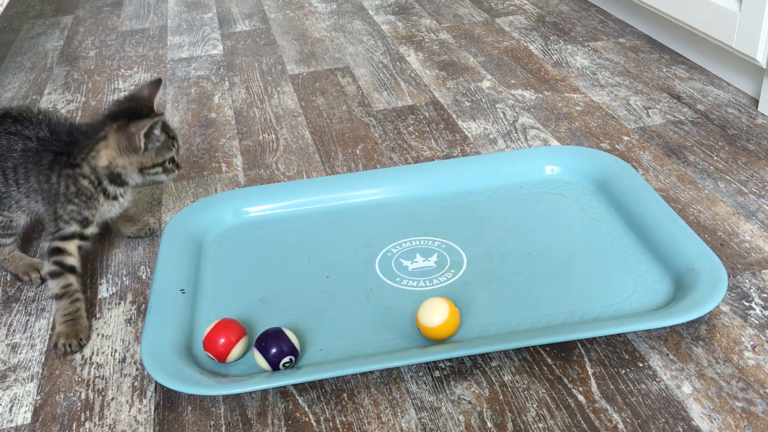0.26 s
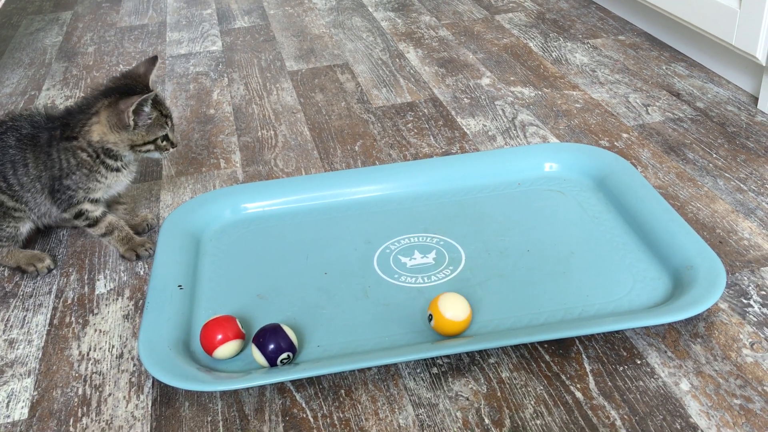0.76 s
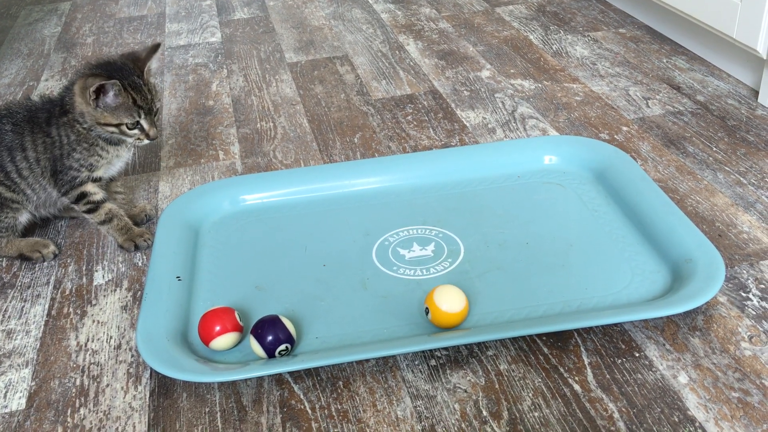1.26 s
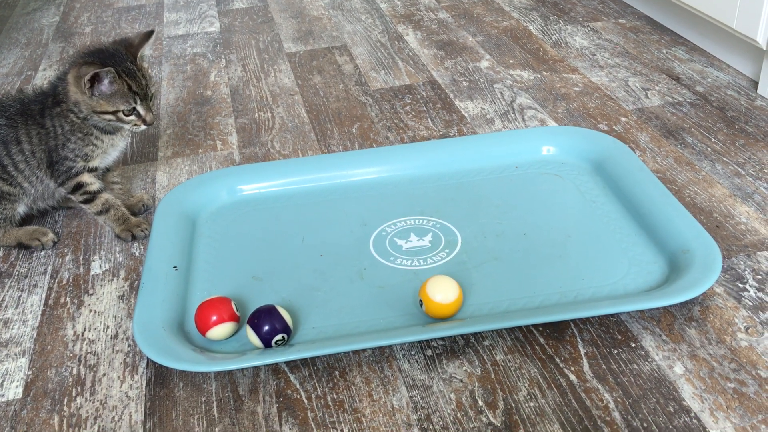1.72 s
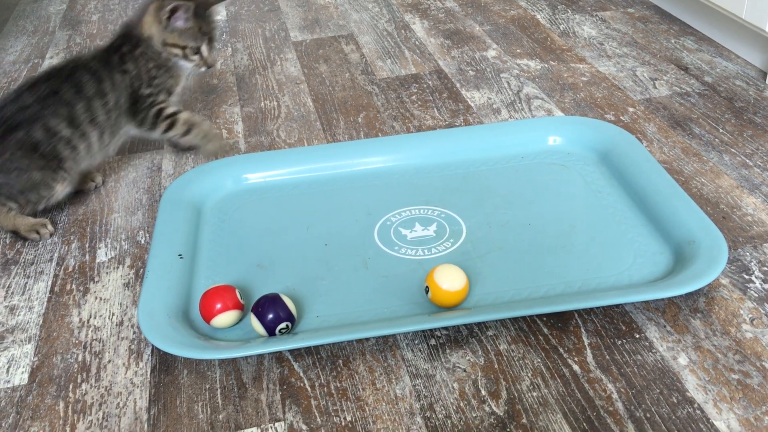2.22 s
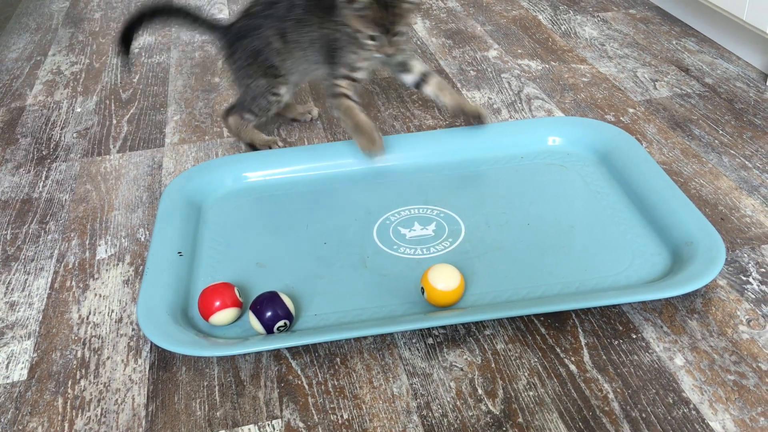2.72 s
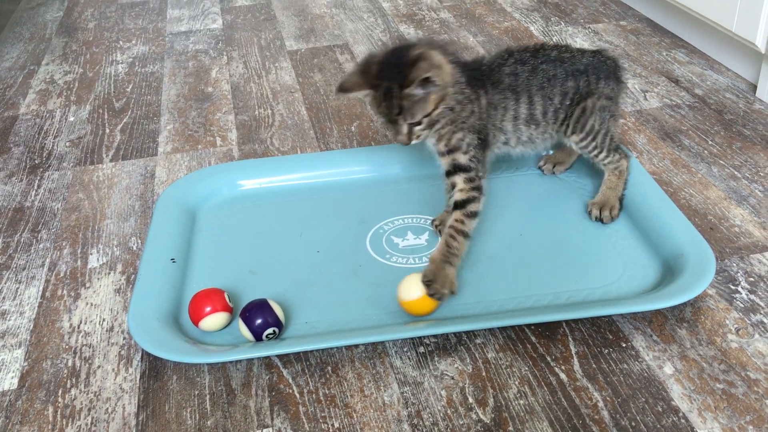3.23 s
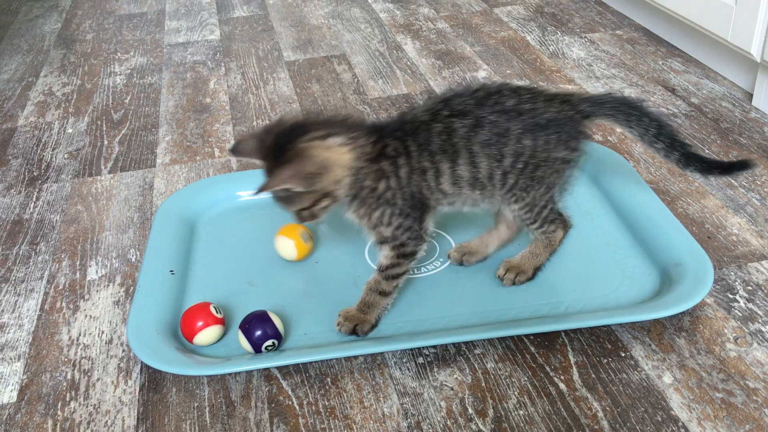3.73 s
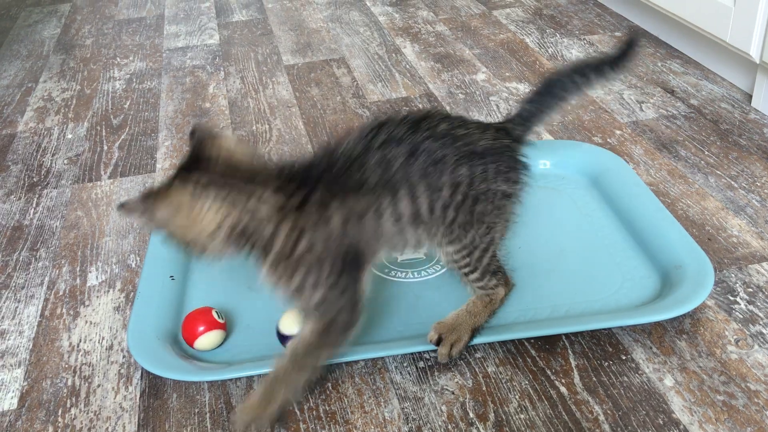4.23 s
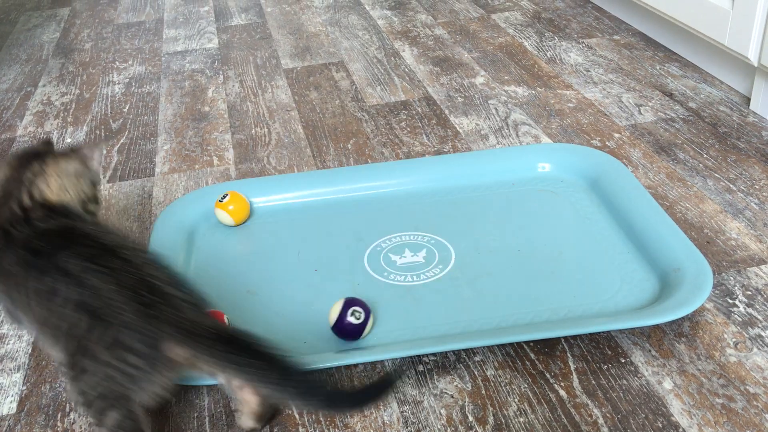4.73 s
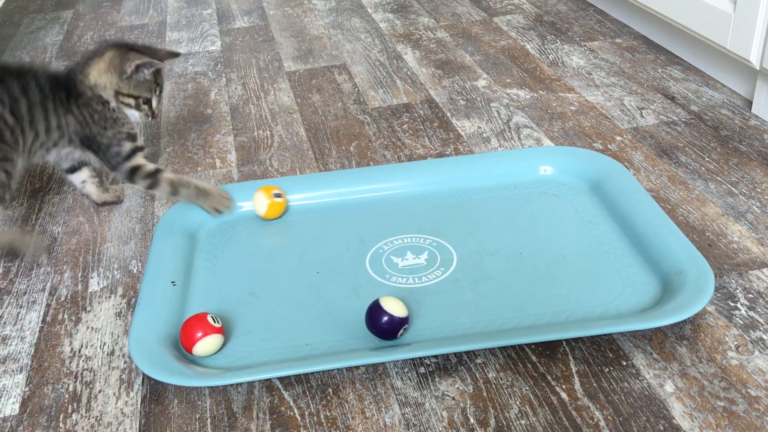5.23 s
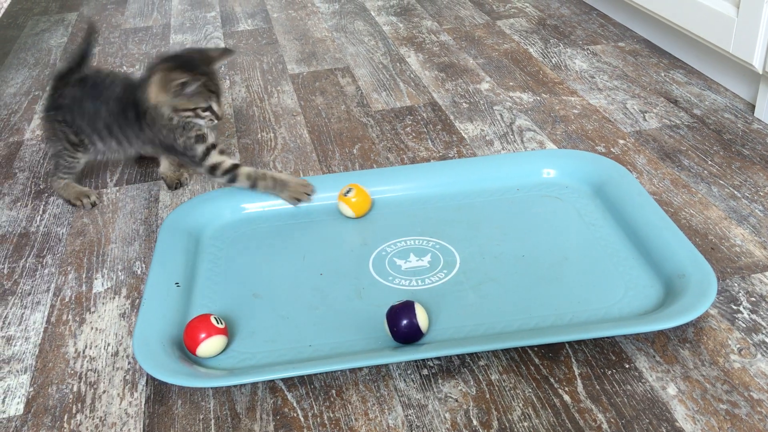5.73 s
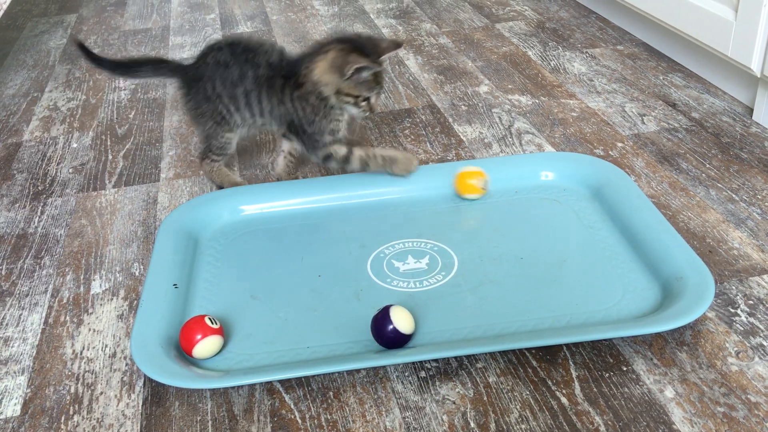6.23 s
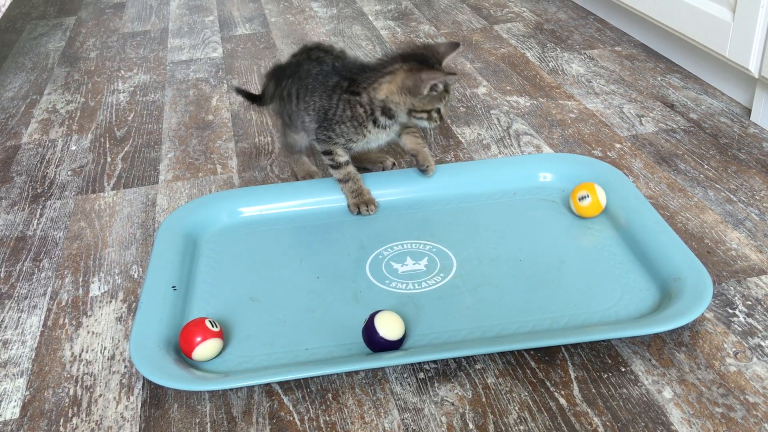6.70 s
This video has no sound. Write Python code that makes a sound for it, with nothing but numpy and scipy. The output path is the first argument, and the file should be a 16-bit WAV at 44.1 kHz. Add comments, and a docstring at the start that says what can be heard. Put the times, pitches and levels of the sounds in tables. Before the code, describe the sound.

In a quiet room, a kitten's soft paws pad and brush, then small hard balls roll and clang sharply against a metal tray's rim.

```python
"""A low room rumble and a faint wavering whine run throughout, as filtered noise and a sine, with a soft
rush of noise that sinks within the first second. From early on, a kitten's paws brush and thud, as shaped
noise and decaying modes, as it steps onto a metal tray on a laminate floor. It bats small billiard balls,
which roll over the tray as trains of random bumps and strike its rim: each place struck excites the
tray's modes in different proportions."""
import sys
import numpy as np
from scipy import signal
from scipy.fft import rfft, irfft
from scipy.io import wavfile
from scipy.ndimage import uniform_filter1d

SR = 44100
rng = np.random.default_rng(int(sys.argv[2]) if len(sys.argv) > 2 else 0)


def output_pcm(signal):
    """Save a mono or channel-first signal as 16-bit PCM at the path in sys.argv[1].

    Samples are clipped to [-1, 1] before scaling.
    """
    pcm = np.clip(np.atleast_2d(signal).T, -1, 1) * 32767
    wavfile.write(sys.argv[1], SR, np.round(pcm).astype(np.int16))


N = 306936
RING_SIZE = 28800  # samples in one impulse response
AGE = np.arange(RING_SIZE) / SR
TIME = np.arange(N) / SR
EDGE_HZ = 16200  # upper band limit

# Levels below are relative: each source adds its own gain. Spectra are scaled to rms 1 in use.
# Spectrum of the room's low rumble: (frequency [Hz], density [dB per Hz])
AIR_SPECTRUM = [(20, -36), (32, -6), (44, -1.5), (62, -3.5), (80, -4), (100, -8), (125, -4), (180, -16.5),
                (300, -21.5), (600, -26), (1300, -33.5), (3000, -39.5), (8000, -42), (16000, -50)]
# Slow changes in the rumble: (time [s], level [dB])
AIR_SWELL = [(0, -0.5), (1.2, 0), (2.95, 2.5), (3.12, 10), (3.35, 0.5), (6.96, 5.5)]
AIR_DB = -63.5
# Spectrum of the soft rush: (frequency [Hz], density [dB per Hz])
RUSH_SPECTRUM = [(150, -2.0), (700, -0.5), (2100, -4.5), (2700, -15.0), (16000, -23.5)]
# Sinking of the soft rush: (time [s], level [dB])
RUSH_FADE = [(0, -69), (.3, -71), (.5, -78.5), (.9, -82)]

# Strokes of fur and pads over tray and floor: (start [s], length [s], level [dB])
STROKES = [(.17, 0.078, -70), (2.07, 0.18, -74.5), (2.39, .04, -79), (2.86, 0.11, -59), (3.03, 0.18, -56),
           (3.065, 0.014, -48), (3.53, 0.21, -75), (4.04, 0.04, -62.5), (4.26, 0.37, -66),
           (4.86, 0.12, -72.5), (5.19, 0.017, -44), (5.24, 0.11, -69), (5.47, 0.024, -61.5),
           (5.78, 0.056, -65.5), (5.99, 0.042, -58), (6.14, 0.1, -52.5), (6.50, .07, -55)]
# A stroke swells, eases off as it slides, and fades when the paw lifts
STROKE_RISE_S, STROKE_EASE_DB_PER_S, STROKE_LIFT_DB_PER_S = 0.034, 12.5, 199.5
# Spectrum of fur strokes and claw ticks: (frequency [Hz], density [dB per Hz])
FUR_SPECTRUM = [(200, -14.5), (1200, -2), (3500, -4), (6000, -1), (10000, -1.5), (12000, -5.5),
                (16000, -4.5)]

# Modes of the tray: (frequency [Hz], T60 [s], level [dB] struck at left, far left, far right, right)
TRAY_MODES = [(379, 0.98, -35.5, -33.5, -29, -30.5), (630, 0.52, -28, -8.5, -19, -22),
              (660, 0.3, -21, -22.5, -27, -29.5), (780, 0.67, -21.5, -21.5, -24, -16.5),
              (829, 0.47, -19, -7, -18.5, -6.5), (939.6, 0.66, -8, -10.5, -32, -14.5),
              (986, 0.32, -6.5, -9.5, -4.5, -21.5), (1041, 0.3, -7.5, -8.5, -11, -8.5),
              (1080, 0.3, -15.5, -9.5, 7, -38), (1258, 0.33, -14, -14, -13, -24),
              (1322, 0.38, -27.5, -12, -12, -25), (1452, 0.38, -2.5, -23, -23, -7.5),
              (1496, 0.4, -19, -7, -31, -26.5), (1556, 0.38, -17.5, -27.5, -9, -10.5),
              (1704, 0.39, -7, -16, -20.5, -8), (1788, 0.29, -24, -12, -3, -22.5),
              (1843, 0.33, -19.5, -15.5, -23, -33.5), (2156, 0.24, -9, -11, -5.5, -9.5),
              (2178, 0.13, -3, -30, -7, 0.5), (2328, 0.2, -9.5, -6, -7, -11),
              (2740, 0.11, -26, -26, -34.5, -14), (3004, 0.22, -18, -19, -37, -41.5),
              (3280, 0.3, -37, -38, -29, -15.5), (3426, 0.25, -22, -20, -31, -15.5),
              (3520, 0.27, -17.5, -46, -23.5, -38), (3543, 0.2, -14, -23, -28, -22),
              (4109, 0.21, -36.5, -26, -23, -10.5), (4140, 0.16, -27.5, -16, -29.5, -23)]
# Striking places, in the order of the level columns above: (name)
PLACES = ["left", "far left", "far right", "right"]
# Decay of the tray's crowded modes, before a damping factor: (frequency [Hz], T60 [s])
PLATE_T60 = [(150, 0.22), (700, 0.14), (1800, 0.11), (3500, 0.11), (7000, 0.075), (14000, 0.061)]
# Decay of the room: (frequency [Hz], T60 [s])
ROOM_T60 = [(150, 0.33), (530, 0.32), (1400, 0.37), (3700, 0.33), (9700, 0.27), (15000, 0.096)]

# Soft paw falls: (time [s], level [dB], hollow knock of the floorboard [dB])
PAW_FALLS = [(0.212, -52.5, 4.5), (.697, -63.5, -25), (1.431, -72, -4), (1.547, -67.5, -3),
             (1.784, -56.5, 2), (2.404, -61.5, -16), (3.137, -49.5, -17), (3.42, -57, -18),
             (4.598, -50, -3), (4.632, -48, -4), (5.048, -59, -2.5), (5.151, -54, -16.5), (5.977, -53, -8),
             (6.165, -47.5, -13), (6.811, -50, 1)]
# Spectrum of a paw's thud: (frequency [Hz], density [dB per Hz])
THUD_SPECTRUM = [(60, 5), (130, -17), (250, -10.5), (430, -1.5), (700, -3.5), (980, -5.5), (1200, -13.5),
                 (2500, -30.5), (8000, -26), (16000, -49)]
# Modes of the floorboard: (frequency [Hz], T60 [s], level [dB])
BOARD_MODES = [(524, 0.17, -7), (695, 0.22, -16.5), (847, 0.032, 9), (974, 0.25, -4.5)]
# Shoves of a paw or ball on the tray's flat bottom: (time [s], level [dB])
SHOVES = [(3.319, -54), (3.3806, -44.5), (3.576, -57), (4.1195, -41.5), (4.143, -37), (5.585, -47),
          (6.215, -32.5), (6.345, -28), (6.562, -40)]
# Spectrum of the shoved tray's dull boom: (frequency [Hz], density [dB per Hz])
BOOM_SPECTRUM = [(100, -20), (350, -19), (520, -4.5), (620, 3), (830, -5.5), (1100, -11.5), (1500, -12),
                 (2500, -22.5), (16000, -56)]
# Claw ticks on floor and tray: (time [s], level [dB])
CLAW_TICKS = [(2.402, -58.5), (3.229, -51.5), (3.455, -61), (3.544, -55.5), (3.941, -55.5), (4.579, -48),
              (4.701, -60.5), (4.836, -60), (5.048, -61.5), (5.319, -57.5), (5.779, -49.5), (6.0196, -47.5),
              (6.1872, -36.5)]

# Ball blows: (time [s], level [dB], place, hardness as treble [dB], ring of the modes [dB])
BLOWS = [(3.037, -53, "left", 0, -3.5), (3.158, -46.5, "right", -27, -5), (3.3817, -45.5, "left", -5.5, -7),
         (3.576, -57, "far right", -5, -1), (3.724, -55, "left", -6, -1),
         (3.779, -42.5, "left", -16.5, -18), (3.9885, -42.5, "far left", -3.5, -31),
         (4.1185, -32.5, "right", 2.5, -17), (4.143, -31.5, "right", -5, -20),
         (4.1723, -16.5, "left", 0, 1), (4.2165, -17.5, "far right", -9, -26),
         (4.2265, -30.5, "left", 6.5, 6), (5.353, -47.5, "far left", -2, 1),
         (5.360, -28, "far left", -1.5, -0.5), (5.448, -36, "far left", -14, -2.5),
         (5.6288, -53, "far left", 6, -5), (5.731, -39.5, "far left", -10, -11),
         (6.2137, -33.5, "far right", 9.5, -8), (6.2337, -17, "far right", 7, -1),
         (6.2387, -11.5, "far right", -1, -10.5), (6.3349, -17, "left", 2, -9),
         (6.5712, -37.5, "right", 0, -1.5), (6.5911, -14.5, "right", 0, 0),
         (6.654, -18.5, "left", -1, -11.5), (6.8617, -40, "right", -4.5, -3.5)]
# Spectrum of the contact click: (frequency [Hz], density [dB per Hz])
CLICK_SPECTRUM = [(300, -4.0), (900, 1.5), (9000, 7.5), (16000, -11.5)]
# Spectrum of the tray's clatter: (frequency [Hz], density [dB per Hz])
CLATTER_SPECTRUM = [(40, -42), (120, -17.5), (300, -17), (480, -24), (620, -7.5), (950, -3.5), (1150, -5.5),
                    (1500, -1), (2250, -7.5), (2600, -10), (5500, -11.5), (9500, -15), (11000, -22.5),
                    (16000, -24)]

# Rolls over the flat bottom or along the curved rim: (start [s], length [s], level [dB], track)
ROLLS = [(3.097, 0.14, -61, "flat"), (3.325, .2, -58.5, "flat"), (3.544, 0.47, -49.5, "flat"),
         (3.942, 0.21, -49.5, "flat"), (4.25, 0.42, -59, "flat"), (5.244, 0.1, -56.5, "rim"),
         (5.336, 0.44, -48.5, "rim"), (6.26, 0.83, -40.5, "rim")]
# A ball gathers speed, friction quietens it steadily, and the rumble dies once it is stopped
ROLL_RISE_S, ROLL_SLOWING_DB_PER_S, ROLL_STOP_DB_PER_S = 0.02, 10.5, 124
SPOT_S = 0.08  # time from one spot of the tray to the next
# Spectrum of rolling on the flat bottom: (frequency [Hz], density [dB per Hz])
FLAT_SPECTRUM = [(60, -6), (150, -4.5), (380, -2), (480, 2), (650, 3), (900, -2.5), (1150, -7),
                 (1500, -4.5), (2200, -12), (4000, -18.5), (8000, -34), (16000, -40.5)]
# Spectrum of rolling along the rim: (frequency [Hz], density [dB per Hz])
RIM_SPECTRUM = [(60, -19), (300, -11), (500, -10), (620, -0.5), (770, -2), (835, 8), (900, -2), (1000, -4),
                (1200, -11), (1520, -5), (2200, -11.5), (4000, -23), (8000, -32.5), (16000, -44)]


def amp(db):
    """Decibel law: level to amplitude gain."""
    return 10 ** (np.asarray(db) / 20)


def unit(x):
    """Power normalisation: scales to rms 1."""
    return x / np.sqrt(np.mean(x ** 2) + 1e-20)


def read(points, hz):
    """Logarithmic pitch scale: interpolates a table over log frequency."""
    table_hz, value = np.transpose(points)
    return np.interp(np.log(hz + 1), np.log(table_hz + 1), value)


def level(curve):
    """Amplitude envelope: gain at every sample from rows (time [s], level [dB])."""
    return amp(np.interp(TIME, *np.transpose(curve)))


def add(mix, s, sound):
    """Superposition: adds a sound into the mix at time s."""
    part = mix[round(s * SR):][:len(sound)]
    part += sound[:len(part)]


def colour(x, spectrum):
    """Spectral shaping: filters x by a spectrum and scales it to rms 1."""
    gain = amp(read(spectrum, np.fft.rfftfreq(len(x), 1 / SR)))
    return unit(np.fft.irfft(rfft(x) * gain, len(x)))


def slow_noise(size):
    """Moving average: noise smoothed over size samples, at rms 1."""
    return unit(uniform_filter1d(rng.standard_normal(N), size=size))


def air(whine_hz=1212, whine_db=-83):
    """Filtered noise and frequency modulation: rumble, a wavering whine and a rush that soon sinks."""
    frequency = whine_hz + 12 * slow_noise(1500)
    whine = amp(whine_db) * np.sin(2 * np.pi * np.cumsum(frequency) / SR)
    rumble = amp(AIR_DB) * colour(rng.standard_normal(N), AIR_SPECTRUM) * level(AIR_SWELL)
    rush = colour(rng.standard_normal(N), RUSH_SPECTRUM) * level(RUSH_FADE)
    return rumble + whine + rush


def motion(rows, rise_s, sag_db_per_s, release_db_per_s):
    """Power addition of movements (start [s], length [s], level [dB]): each swells, sags, then dies."""
    power = np.zeros(N)
    for start, length, db in rows:
        age = np.maximum(TIME - start, 0)
        fall_db = sag_db_per_s * age + release_db_per_s * np.maximum(age - length, 0)
        gain = (1 - np.exp(-age / rise_s)) * amp(db - fall_db)
        power += gain ** 2
    return np.sqrt(power)


def hardness(hz, treble_db, knee_hz=1300, top_hz=8000):
    """Contact time: a shorter contact feeds more treble, reaching treble_db at top_hz."""
    treble_share = np.log((hz + 1) / knee_hz) / np.log(top_hz / knee_hz)
    return amp(treble_db * np.clip(treble_share, 0, 1.3))


def mode(hz, t60, db):
    """Damped oscillation: one exponentially dying partial of random phase."""
    return amp(db - 60 * AGE / t60) * np.sin(2 * np.pi * (hz * AGE + rng.random()))


def ring(place, treble_db, early_db=-1, early_t60=0.14):
    """Modal superposition: a blow at one place gives a brief detuned clang, then the clear ring."""
    clang, clear = np.zeros(RING_SIZE), np.zeros(RING_SIZE)
    for hz, t60, *place_db in TRAY_MODES:
        db = place_db[PLACES.index(place)]
        hard = hardness(hz, treble_db)
        detuned_hz = hz * (1 + 0.0069 * rng.standard_normal())
        clang += hard * mode(detuned_hz, early_t60, db + early_db)
        clear += hard * amp(db - 60 * AGE / t60) * np.sin(2 * np.pi * hz * AGE)
    # bending waves take a moment to spread over the tray
    return clang * (1 - np.exp(-AGE / 0.00029)) + clear * (1 - np.exp(-AGE / 0.00053))


def brushing(patch_db=1.0, tray_db=-11):
    """Friction noise: fur and pads slide with an uneven hiss that stirs the tray a little."""
    patches = amp(patch_db * slow_noise(700))
    sliding = motion(STROKES, STROKE_RISE_S, STROKE_EASE_DB_PER_S, STROKE_LIFT_DB_PER_S)
    hiss = colour(rng.standard_normal(N) * patches, FUR_SPECTRUM) * sliding
    body = ring("left", 28) * np.exp(-AGE / 0.012)
    return hiss + amp(tray_db) * signal.oaconvolve(hiss, body / np.linalg.norm(body))[:N]


def burst(spectrum, treble_db, room_db, damping, count=12):
    """Statistical decay: crowded modes die band by band; the room swells in behind them and lingers."""
    hz, centres = np.fft.rfftfreq(RING_SIZE, 1 / SR), np.geomspace(150, 15000, count)
    noise = rfft(colour(rng.standard_normal(RING_SIZE), spectrum)) * hardness(hz, treble_db)
    out = np.zeros(RING_SIZE)
    for centre, share in zip(centres, np.eye(count)):
        direct = amp(-60 * AGE * damping / read(PLATE_T60, centre))
        # the room weakens by 1.3 dB per octave
        room = amp(room_db - 1.3 * np.log2(centre / 1500) - 60 * AGE / read(ROOM_T60, centre))
        band = irfft(noise * np.interp(np.log(hz + 1), np.log(centres), share))
        out += band * np.hypot(direct, room * (1 - np.exp(-AGE / 0.035)))
    return out


def paws(thud_db=4, boom_db=3):
    """Soft impact: padded feet thud and knock loose-laid boards, shoves boom the tray, claws tick."""
    out = np.zeros(N)
    soft_onset = 1 - np.exp(-AGE / 0.00025)
    for s, db, knock_db in PAW_FALLS:
        knock = amp(knock_db) * sum(mode(*row) for row in BOARD_MODES)
        thud = amp(thud_db) * burst(THUD_SPECTRUM, 0, room_db=-5.0, damping=1.56)
        add(out, s, amp(db) * soft_onset * (thud + knock))
    for s, db in SHOVES:
        boom = burst(BOOM_SPECTRUM, 0, room_db=-5.5, damping=1.0)
        add(out, s, amp(db + boom_db) * soft_onset * boom)
    for s, db in CLAW_TICKS:
        add(out, s, amp(db) * burst(FUR_SPECTRUM, -3.4, room_db=-4, damping=1.03))
    return out


def blows(clatter_db=-2, ping_db=-23, ping_t60=0.26, count=44):
    """Impact excitation: each blow gives a click, a ping, a clatter of crowded modes and the tray's ring."""
    out = np.zeros(N)
    # high modes of the metal; T60 falls in inverse proportion to frequency
    ping_hz = np.geomspace(2600, 10500, count) * rng.uniform(0.98, 1.02, count)
    pings = np.array([mode(hz, ping_t60 * ping_hz[0] / hz, 0) * hardness(hz, -4.5) for hz in ping_hz])
    for s, db, place, treble_db, ring_db in BLOWS:
        crack = colour(rng.standard_normal(RING_SIZE), CLICK_SPECTRUM)
        click = amp(treble_db) * crack * np.exp(-AGE / 0.0012)
        # each contact point feeds the high modes in different shares
        ping_shares = rng.standard_normal(count) * hardness(ping_hz, treble_db)
        ping = amp(ping_db) * ping_shares @ pings
        clatter = amp(clatter_db) * burst(CLATTER_SPECTRUM, treble_db, room_db=-2.5, damping=0.75)
        tray_ring = amp(ring_db) * ring(place, treble_db)
        add(out, s, amp(db) * (click + ping + clatter + tray_ring))
    return out


def wander(count=4):
    """Equal-power crossfade: shares pass cyclically between spots; their squares sum to 1."""
    spots = np.arange(count)[:, None]
    shares = np.maximum(np.cos(2 * np.pi * (TIME / SPOT_S - spots) / count), 0)
    return shares / np.linalg.norm(shares, axis=0)


def roll(track, spectrum, place, modes_db, bumps_per_s, spread_db, uneven_db):
    """Random impulse excitation: tiny bumps in uneven patches keep the tray rumbling and singing."""
    rows = [row[:-1] for row in ROLLS if row[-1] == track]
    speed = motion(rows, ROLL_RISE_S, ROLL_SLOWING_DB_PER_S, ROLL_STOP_DB_PER_S)
    patches = uneven_db * slow_noise(1400)
    sizes_db = patches + spread_db * np.minimum(rng.exponential(1, N), 3)
    sizes = amp(sizes_db) * rng.choice([-1, 1], N)
    bumps = unit(sizes * (rng.random(N) < bumps_per_s / SR)) * speed
    singing, out = ring(place, -9.5), np.zeros(N)
    # the crowded modes answer differently from spot to spot as the ball travels
    for share in wander():
        rumble = burst(spectrum, 0, room_db=-17.5, damping=1.2)
        tray = rumble / np.linalg.norm(rumble) + amp(modes_db) * singing / np.linalg.norm(singing)
        out += signal.oaconvolve(bumps * share, tray / np.linalg.norm(tray))[:N]
    return out


def rolling():
    """Mass loading: the kitten's weight mutes the modes under flat rolls; the rim sings more freely."""
    flat = roll("flat", FLAT_SPECTRUM, "left", modes_db=-11.5, bumps_per_s=820, spread_db=2.5, uneven_db=4.5)
    rim = roll("rim", RIM_SPECTRUM, "far left", modes_db=-6.5, bumps_per_s=140, spread_db=6.5, uneven_db=0.5)
    return flat + rim


def scene():
    """Linear superposition: all sources sum at one near microphone."""
    return (air() + brushing() + paws() + blows() + rolling())[None]


def record(dry, ceiling=1.5, low_cut_hz=37):
    """Filtering and saturation: the microphone drops deep bass and rounds peaks; then the band limit."""
    low_cut = signal.butter(4, low_cut_hz, "highpass", fs=SR, output="sos")
    thinned = signal.sosfilt(low_cut, dry)
    rounded = ceiling * np.tanh(thinned / ceiling)
    band_limit = signal.firwin(201, EDGE_HZ, window=("kaiser", 9), fs=SR)
    return signal.oaconvolve(rounded, band_limit[None], "same")


dry = scene()
out = record(dry)
output_pcm(out)
```